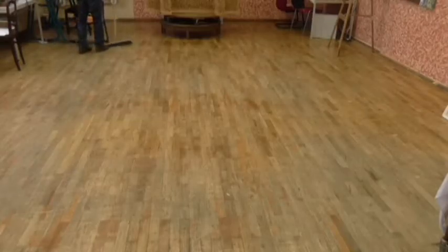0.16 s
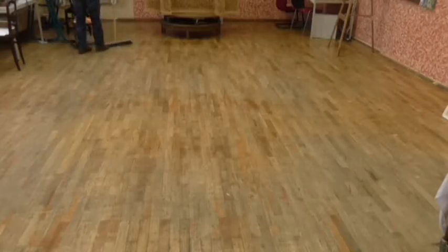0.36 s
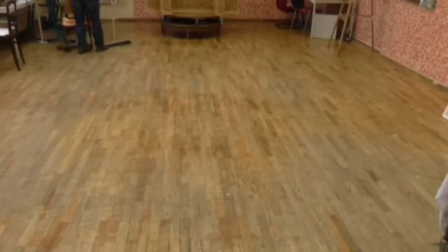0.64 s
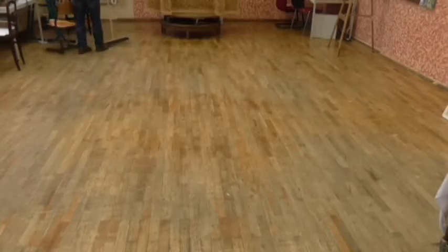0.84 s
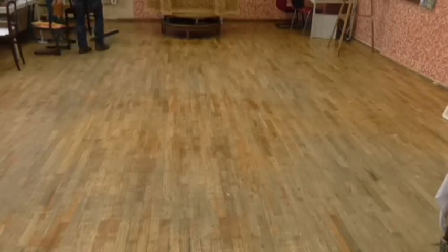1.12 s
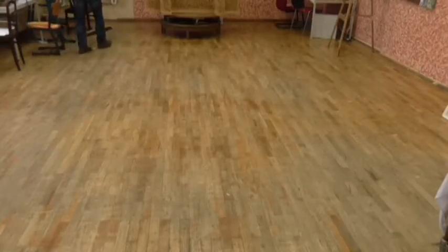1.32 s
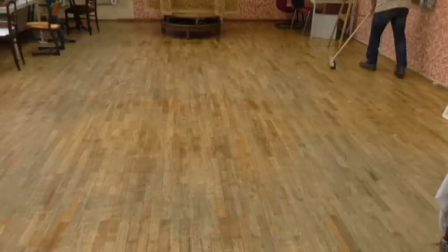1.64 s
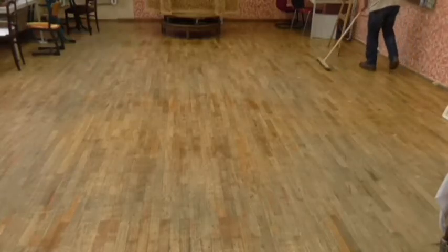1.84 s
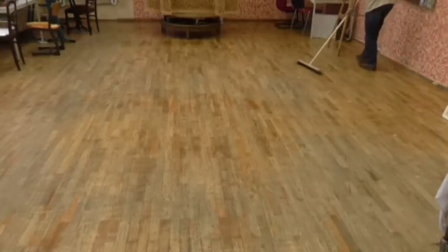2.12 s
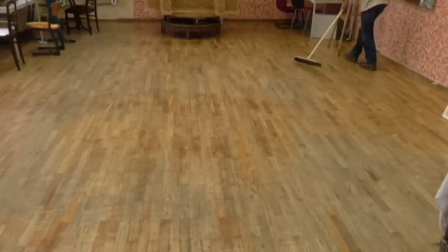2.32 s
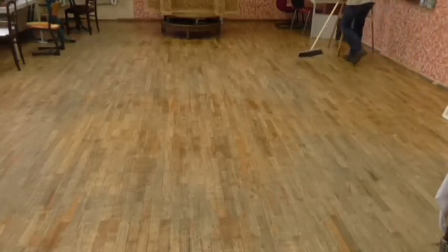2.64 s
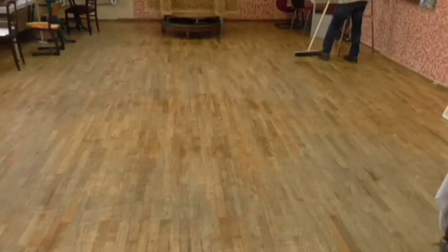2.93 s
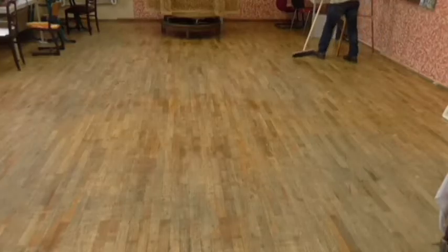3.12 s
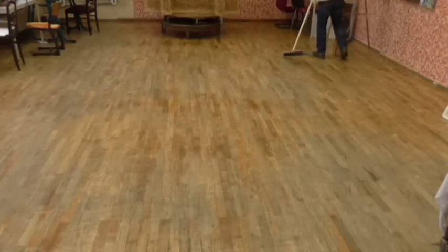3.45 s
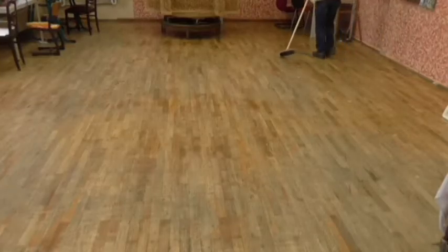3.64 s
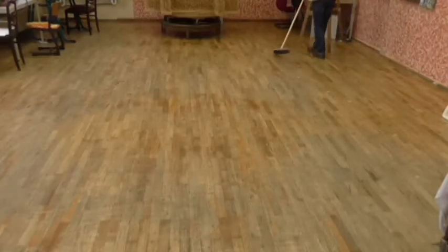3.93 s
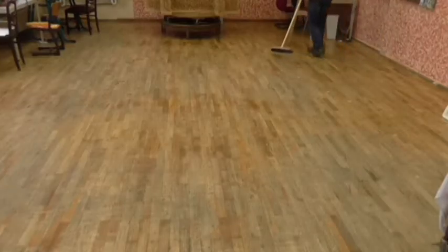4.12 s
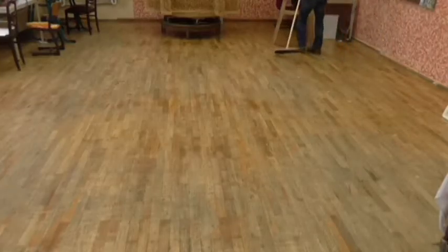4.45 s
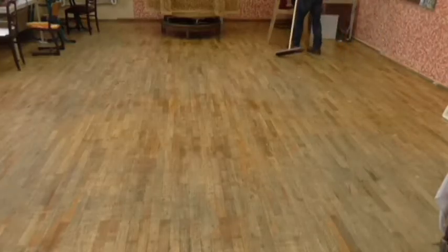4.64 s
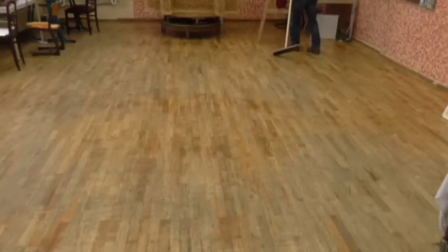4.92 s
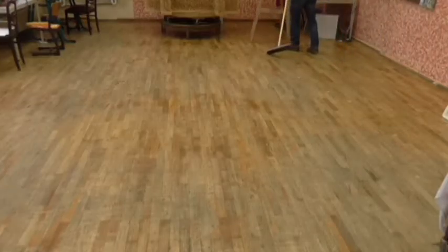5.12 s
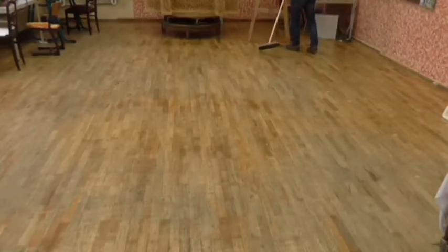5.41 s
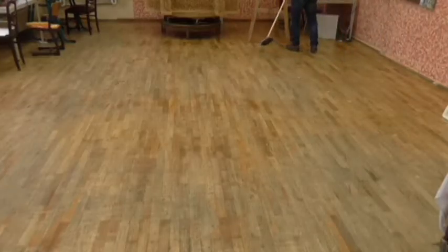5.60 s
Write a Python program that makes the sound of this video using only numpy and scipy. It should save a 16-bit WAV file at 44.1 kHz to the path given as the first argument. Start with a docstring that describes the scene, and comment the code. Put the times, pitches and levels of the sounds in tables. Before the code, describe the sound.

A push broom swishes in uneven strokes over a wooden hall floor, with sharp clacks and hollow thumps, then quietens to sparse knocks.

```python
"""Push broom on parquet

A push broom sweeps the sprung wooden floor of a large empty hall. Slip noise makes bristle hiss, tip fizz
and head rumble; short noise bursts are flicks, scuffs and clacks; knocks are chirps, rattle and floor modes.
Decaying noise tails answer the knocks and bursts, over a low rush of air; the sound drops out once, briefly.
"""
import sys
import numpy as np
from scipy import signal
from scipy.fft import rfft, irfft, next_fast_len
from scipy.io import wavfile
from scipy.ndimage import map_coordinates

SR = 44100
rng = np.random.default_rng(int(sys.argv[2]) if len(sys.argv) > 2 else 0)


def digitize_waveform(pressure):
    """Quantize a signal to 16-bit integers and store it at the path in sys.argv[1].

    Rows of a 2-D input are taken as channels; values are limited to [-1, 1].
    """
    field = np.atleast_2d(pressure).T
    bounded = np.clip(field, -1, 1)
    quanta = np.round(bounded * 32767).astype(np.int16)
    wavfile.write(sys.argv[1], SR, quanta)


N = 254456


def amp(db):
    """Decibels to gain."""
    return 10 ** (np.asarray(db) / 20)


def unit(x):
    """x scaled to rms 1."""
    return x / np.sqrt(np.mean(x ** 2) + 1e-20)


def along(points, hz):
    """(Hz, value) points interpolated on a log frequency axis."""
    f, v = np.transpose(points)
    return np.interp(np.log(hz + 1), np.log(f + 1), v)


def filtered(x, response):
    """x multiplied by a frequency response in the spectrum."""
    n = x.shape[-1]
    m = next_fast_len(n + 4096, True)
    return irfft(rfft(x, m) * response(np.fft.rfftfreq(m, 1 / SR)), m)[..., :n]


def edge(ratio, order=3):
    """Gain of a filter slope that closes as ratio passes 1."""
    return 1 / np.sqrt(1 + ratio ** (2 * order))


def diffuse(pair, colour):
    """Two unrelated signals, as mid and side, become coloured stereo of rms 1."""
    # stereo width: (frequency [Hz], side over mid [dB])
    side_db = [(25, -11), (60, -15), (125, -17), (250, -18.5), (500, -14.5), (1000, -11), (2000, -8),
               (4000, -9), (8000, -4.5), (12000, -6)]

    def response(hz):
        return colour(hz) * np.array([np.ones_like(hz), amp(along(side_db, hz))])

    mid, side = filtered(pair, response)
    return unit(np.array([mid + side, mid - side]))


def noise(colour, size):
    """Smooth diffuse noise of rms 1."""
    return diffuse(rng.standard_normal((2, size)), colour)


def wobble(knots_per_s):
    """A smooth random curve through evenly spaced knots."""
    knots = rng.standard_normal(int(N * knots_per_s / SR) + 4)
    return map_coordinates(knots, [np.arange(N) * knots_per_s / SR])


def add(track, s, sound):
    """Mix a sound into the track at time s."""
    part = track[:, max(round(s * SR), 0):][:, :sound.shape[-1]]
    part += sound[..., :part.shape[-1]]


def boards(hz):
    """What the wooden floor radiates: a broad, low hump."""
    # floor colour: (frequency [Hz], relative density [dB per Hz])
    board_db = [(25, -17), (50, 8.5), (115, 0.5), (195, -4.5), (270, 2.5), (400, -3.5), (750, -6.5),
                (1200, -12.5), (2000, -16), (2700, -25), (6000, -32.5)]
    return amp(along(board_db, hz))


def stroke_gains():
    """Gains of hiss, fizz and rumble: each push swells, sags as the arms reach out, and dies away."""
    # pushes: (start [s], length [s], hiss [dB], fizz of the tips [dB], rumble of the head [dB]),
    # levels at the start, before the sag
    strokes = [(0.253, .3, -60.5, -63.5, -56.5), (0.628, 1, -52.5, -54, -54.5),
               (1.576, 0.37, -49.5, -53, -43.5), (2.026, 0.2, -48, -54.5, -37.5),
               (2.505, 0.053, -43.5, -48, -34.5), (2.934, 0.17, -45.5, -52.5, -41.5),
               (3.25, 0.38, -58.5, -66, -60.5), (3.705, 0.18, -52, -59, -45), (4.44, 1, -68, -71.5, -64),
               (5.587, 0.34, -63, -65, -51)]
    attack_s, release_s, sag_db_per_s = 0.13, 0.12, 3
    t = np.arange(N) / SR
    gains = np.zeros((3, N))
    for start, length, *levels_db in strokes:
        early = np.maximum(start - t, 0) / attack_s
        late = np.maximum(t - start - length, 0) / release_s
        sag_db = sag_db_per_s * np.clip(t - start, 0, length)
        push = amp(np.array(levels_db)[:, None] - sag_db) * np.exp(-early ** 2 - late)
        gains = np.maximum(gains, push)  # the loudest push wins
    return gains


def friction(colour, slips_per_s, spread_db, flutter_db):
    """Countless tiny slips of uneven size, fluttering in level as the tufts catch and let go."""
    slips = (rng.random(N) < slips_per_s / SR) * amp(spread_db * rng.standard_normal(N))
    grains = slips * rng.standard_normal((2, N))
    return unit(diffuse(grains, colour) * amp(flutter_db * wobble(70)))


def sweeping(hiss_gain, fizz_gain, drag_gain):
    """Bristles hiss over the wood while the dragged head makes the boards rumble."""
    # bristle colours: (frequency [Hz], relative density [dB per Hz])
    hiss_db = [(30, -30), (150, -30), (800, -6), (1700, -12), (2700, -12), (4000, -2), (6200, -3),
               (8500, -12), (13000, -30)]
    fizz_db = [(4000, -2), (7500, 5.5), (10500, 9), (14000, 3), (16000, -14)]

    def hiss_colour(hz):
        return amp(along(hiss_db, hz))

    def fizz_colour(hz):
        return amp(along(fizz_db, hz))

    def drag_colour(hz):
        return boards(hz) * edge(210 / (hz + 1))  # too light to move the deep bass

    hiss = hiss_gain * friction(hiss_colour, slips_per_s=20000, spread_db=1.5, flutter_db=.4)
    fizz = fizz_gain * friction(fizz_colour, slips_per_s=20000, spread_db=2, flutter_db=.4)
    drag = drag_gain * friction(drag_colour, slips_per_s=9000, spread_db=2.0, flutter_db=1.5)
    return hiss + fizz + drag


def flick(s, db, high_hz, t60_s):
    """One burst row for flicks(): short ones start sharply, dull ones carry more of the wooden head."""
    wood_db = 1.5 - 5.5 * np.log2(high_hz / 8000)  # 5.5 dB per octave
    rise_s = .014 * t60_s
    return s, db, high_hz, wood_db, rise_s, t60_s


def bursts(fizz_gain, stray_count=30):
    """Rows of all bursts: flicks, the bend and release of each scuff, and strays that follow the fizz."""
    # bristle flicks and head clacks: (time [s], level [dB], high edge [Hz], t60 [s])
    flick_rows = [(.061, -50.5, 8000, 0.11), (0.248, -46.5, 8300, 0.19), (.356, -50.5, 13000, .15),
                  (.622, -40.5, 13000, 0.22), (.695, -37, 10500, .09), (.821, -24.5, 16000, 0.028),
                  (.833, -27, 12900, .06), (.93, -38, 11000, 0.1), (1.465, -24.5, 5700, 0.019),
                  (1.536, -31, 11200, 0.13), (1.652, -40, 6960, .05), (1.93, -33, 9800, 0.08),
                  (2.064, -33.5, 4500, 0.048), (2.335, -45.5, 14000, .25), (2.396, -23, 6800, 0.052),
                  (2.453, -22, 5570, 0.042), (2.461, -30, 9900, 0.36), (2.541, -28.5, 9250, 0.041),
                  (2.646, -35.5, 6800, 0.32), (2.791, -32, 10000, 0.085), (3.015, -31, 16000, 0.027),
                  (3.274, -34.5, 7500, 0.0081), (3.897, -33, 6100, 0.11), (4.371, -52.5, 8000, 0.4),
                  (4.429, -42, 2600, 0.06), (5.074, -32, 6800, 0.041), (5.535, -35.5, 4080, 0.051),
                  (5.572, -32, 5100, 0.053)]
    # scuffs, in which tufts bend and spring free: (release time [s], release level [dB])
    scuffs = [(.826, -32.5), (1.39, -43.5), (2.826, -28.5), (3.45, -47.5), (3.738, -38), (5.441, -35),
              (5.734, -34.5)]
    bend_lead_s, bend_db, bend_rise_s, bend_t60_s = .017, -3, 0.0082, .14
    spring_rise_s, spring_t60_s, scuff_hz, scuff_wood_db = 0.0032, 0.082, 8200, 6
    stray_over_fizz_db, stray_hz, stray_t60_s = 8, 11000, .05

    rows = [flick(*row) for row in flick_rows]
    for s, db in scuffs:
        rows.append((s - bend_lead_s, db + bend_db, scuff_hz, scuff_wood_db, bend_rise_s, bend_t60_s))
        rows.append((s, db, scuff_hz, scuff_wood_db, spring_rise_s, spring_t60_s))
    for place in rng.random(stray_count):
        fizz_db = 20 * np.log10(fizz_gain[int(place * N)] + 1e-9)
        rows.append(flick(place * N / SR, fizz_db + stray_over_fizz_db, stray_hz, stray_t60_s))
    return rows


def flicks(rows, grain_db=3, crackle_db=3, crackles_per_s=700, head_hz=2100, head_octaves=1.0):
    """Tufts spring free or slap down in a short, crackling burst; the wooden head adds its hollow tone."""
    # burst colour: (frequency [Hz], relative density [dB per Hz])
    clack_db = [(30, -38), (200, -15), (700, -6), (1500, -6), (2700, -11.5), (4000, -3.5), (6000, -5),
                (8500, -10), (13000, -5.5), (16000, -12)]
    track, t = np.zeros((2, N)), np.arange(SR // 4) / SR

    def head(hz):
        return np.exp(-(np.log2((hz + 1) / head_hz) / head_octaves) ** 2)

    for s, db, high_hz, wood_db, rise_s, t60_s in rows:
        def colour(hz):
            return amp(along(clack_db, hz) + wood_db * head(hz)) * edge(hz / high_hz)

        # single bristles let go in small bunches
        bunches = np.interp(t * crackles_per_s, np.arange(len(t)), rng.standard_normal(len(t)))
        grain = rng.standard_normal(len(t))
        grit = rng.standard_normal((2, len(t))) * amp(grain_db * grain + crackle_db * bunches)
        envelope = (1 - np.exp(-(t / rise_s) ** 2)) * amp(-60 * t / t60_s)
        add(track, s, amp(db) * diffuse(grit, colour) * envelope)
    return track


def knocks(travel_s=0.00403, travel_hz=1000, build_s=0.0056, scatter_db=1.5, wave_top_hz=2050):
    """Each blow sends a bending wave through the floor, treble first; then the boards rattle and ring."""
    # blows: (time [s], level [dB], low edge [Hz], high edge [Hz], first wave over the level [dB])
    blows = [(.246, -43.5, 302, 2500, -2), (.635, -45.5, 171, 1800, 4), (.82, -45, 170, 2500, -3),
             (1.358, -45, 200, 710, 0), (1.463, -34.5, 240, 1900, 0), (1.537, -27.5, 173, 680, -5),
             (1.745, -39, 90, 550, -8), (1.819, -29.5, 140, 1700, -0.5), (1.923, -32.5, 210, 700, 0),
             (2.004, -28, 224, 1550, 0), (2.396, -25.5, 151, 1400, -18.5), (2.457, -23.5, 161, 1410, 8),
             (2.645, -16.5, 298, 1470, 8), (2.664, -13.5, 142, 610, 0), (3.493, -33, 135, 1900, 10),
             (3.597, -42, 150, 930, 0), (3.733, -34, 1380, 1480, 13.5), (3.826, -39, 1220, 1140, 14),
             (3.8945, -32, 1000, 1330, 19.5), (3.9, -32, 332, 1000, 6), (4.369, -31, 68, 500, 1.5),
             (4.426, -40.5, 140, 1620, 7), (4.833, -48.5, 150, 1700, 1.5), (5.071, -41, 513, 3000, -8),
             (5.571, -42.5, 260, 2000, 4)]
    # modes of the sprung floor: (frequency [Hz], level [dB], t60 [s])
    floor_modes = [(74, -10, 1.4), (160, -10, .55), (261, -14, .55), (328, -14, .45), (358, -19, .4),
                   (591, -19, .5), (696, -21, .5), (881, -23, .5), (1441, -25, .4)]
    track, t = np.zeros((2, N)), np.arange(SR * 3 // 4) / SR
    impulse = 1. * (t[:SR // 20] == 0)
    mode_hz, mode_db, mode_t60_s = np.transpose(floor_modes)
    mode_decay = amp(mode_db[:, None] - 60 * t / mode_t60_s[:, None])
    modes = mode_decay * np.sin(2 * np.pi * mode_hz[:, None] * t)

    def travel(hz):
        # speed grows with the root of frequency: travel_s at travel_hz; the shortest waves never arrive
        return np.exp(-4j * np.pi * travel_s * np.sqrt(hz * travel_hz)) * edge(hz / wave_top_hz, order=8)

    for s, db, low_hz, high_hz, first_db in blows:
        def contact(hz):
            # heavy blows reach lower, hard ones higher
            return edge(low_hz / (hz + 1)) * edge(hz / high_hz, order=2)

        # blows that reach lower rattle for longer
        rattle_t60_s = 0.32 * (200 / low_hz) ** 0.35
        chirp = filtered(impulse, lambda hz: contact(hz) ** 4 * travel(hz))
        rattle = noise(lambda hz: boards(hz) * contact(hz), len(t)) * amp(-60 * t / rattle_t60_s)
        # random sign and strength of each mode, for the place of the blow
        sign_draw, strength_draw = rng.standard_normal((2, len(modes)))
        mode_gain = contact(mode_hz) ** 2 * np.sign(sign_draw) * amp(scatter_db * strength_draw)
        ring = mode_gain @ modes
        # a soft landing has little first wave and builds slowly
        swell = 1 - np.exp(-(t / (build_s * amp(-first_db / 2))) ** 2)
        add(track, s, amp(db) * swell * (rattle + ring))
        add(track, s, amp(db + first_db) * chirp / np.abs(chirp).max())
    return track


def hall(x, delay_s=.012, count=14):
    """Reverberation: noise tails with a decay set by frequency, drawn anew for each section of time."""
    # hall decay: (frequency [Hz], t60 [s])
    hall_t60_s = [(70, 0.63), (200, 1), (500, 0.65), (1500, 0.49), (5000, 0.37), (13000, 0.26)]
    track, size = np.zeros((2, N)), N // count
    for start in range(0, N - size + 1, size):
        hz, t, z = signal.stft(noise(np.ones_like, SR), SR, nperseg=256)
        decay = amp(-60 * t / along(hall_t60_s, hz)[:, None])
        tail = signal.istft(z * decay, SR, nperseg=256)[1]
        mono = x[:, start:start + size].mean(axis=0, keepdims=True)
        echo = signal.fftconvolve(mono, tail / np.linalg.norm(tail[0]), axes=1)
        add(track, start / SR + delay_s, echo)
    return track


def still_air():
    """The still hall: steady noise, a low rush of air with a faint hiss above it."""
    # room colour: (frequency [Hz], relative density [dB per Hz])
    room_db = [(25, -22), (60, -12), (100, -5.5), (135, 2), (200, -7.5), (320, -10.5), (480, -15),
               (900, -17.5), (1600, -17), (2480, -20), (2750, -27), (5000, -25), (8000, -32.5),
               (15000, -35)]
    return amp(-57.0) * noise(lambda hz: amp(along(room_db, hz)), N)


def scene():
    """Broom and floor, echoes of the knocks and bursts, and the still air of the hall."""
    hiss_gain, fizz_gain, drag_gain = stroke_gains()
    sweep = sweeping(hiss_gain, fizz_gain, drag_gain)
    bristles = flicks(bursts(fizz_gain))
    wood = knocks()
    echoes = hall(amp(-8.5) * wood + amp(-3.0) * bristles)
    return sweep + wood + bristles + echoes + still_air()


def record(dry, low_cut_hz=44, top_hz=15800):
    """Two ports thin the deepest bass and differ slightly in colour; one dropout, then a sharp treble cut."""
    # port balance: (frequency [Hz], left minus right [dB])
    lean_db = [(60, 4.5), (110, -4), (200, 1.5), (380, -1), (700, -1), (1290, 0), (2380, -1), (4400, -1),
               (8120, -2), (15000, -2)]
    # dropout: start [s], end [s]
    gap_start_s, gap_end_s = (3.780, 3.801)

    def ports(hz):
        return amp(np.array([[.5], [-.5]]) * along(lean_db, hz)) * edge(low_cut_hz / (hz + 1))

    t = np.arange(N) / SR
    live = (t < gap_start_s) | (t > gap_end_s)
    return filtered(filtered(dry, ports) * live, lambda hz: hz < top_hz)


dry = scene()
out = record(dry)
digitize_waveform(out)
```